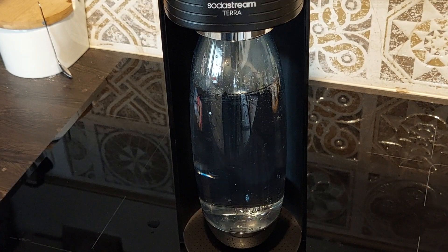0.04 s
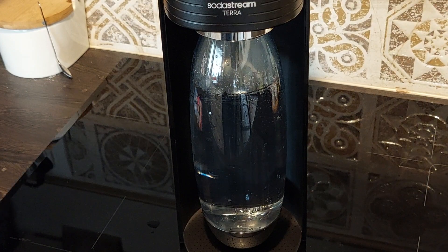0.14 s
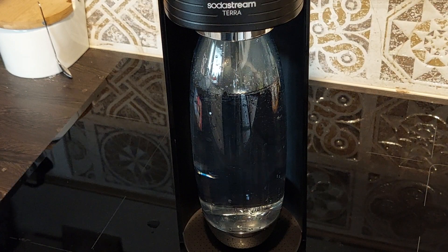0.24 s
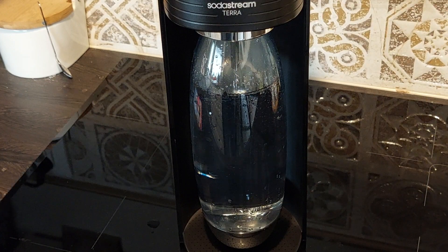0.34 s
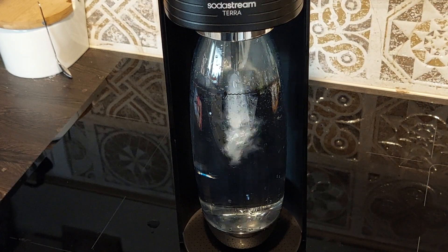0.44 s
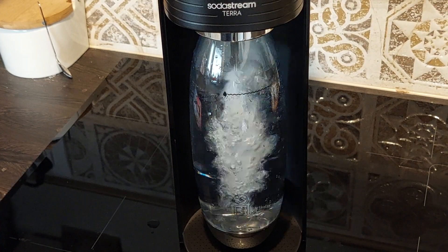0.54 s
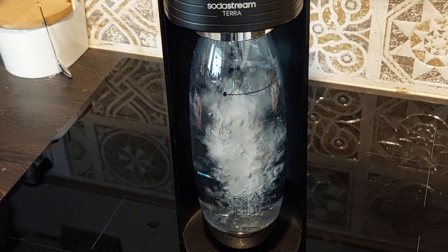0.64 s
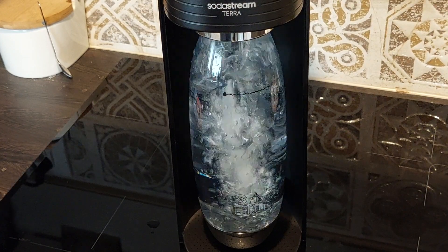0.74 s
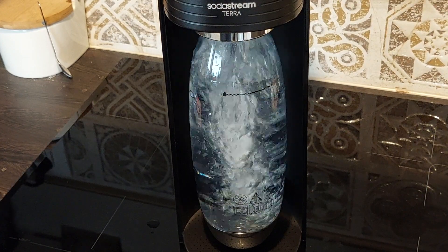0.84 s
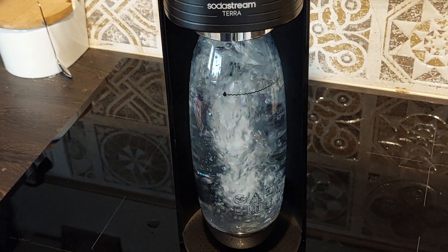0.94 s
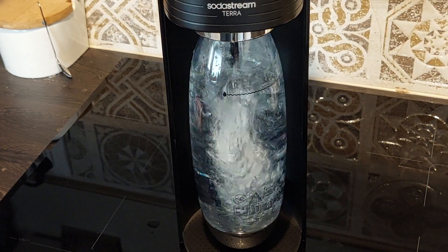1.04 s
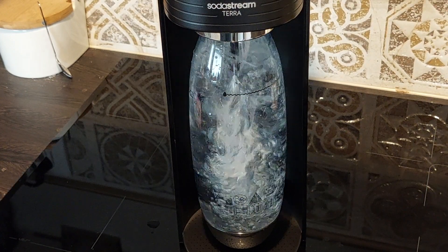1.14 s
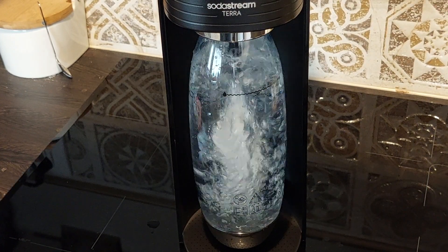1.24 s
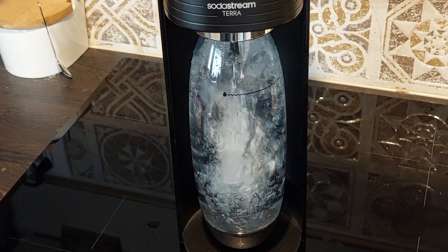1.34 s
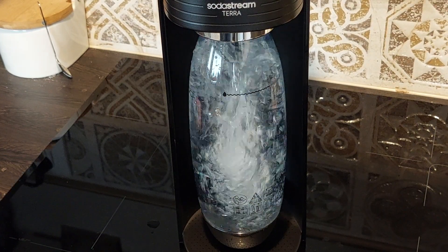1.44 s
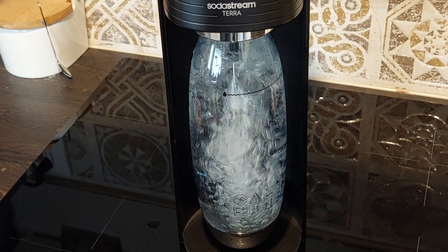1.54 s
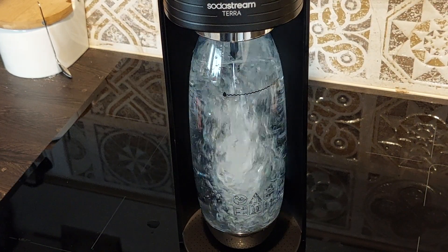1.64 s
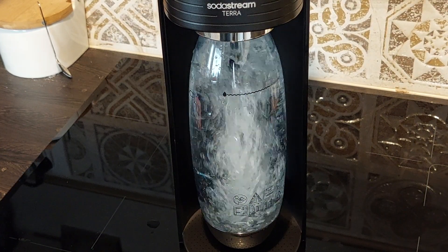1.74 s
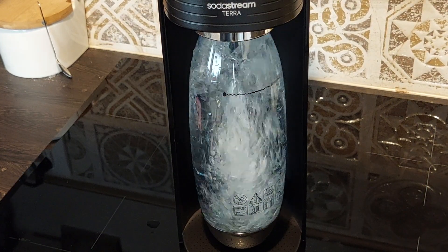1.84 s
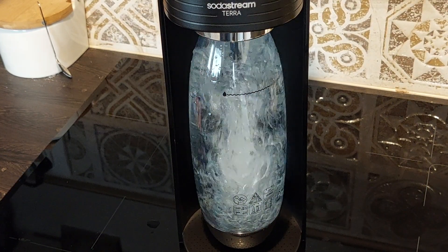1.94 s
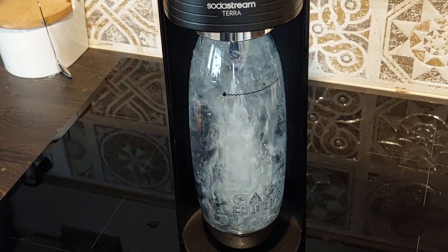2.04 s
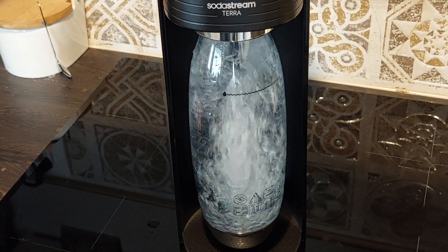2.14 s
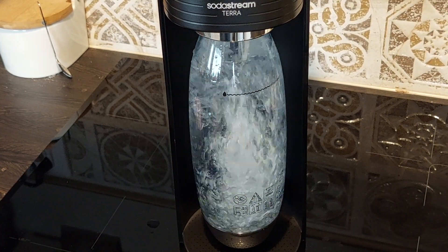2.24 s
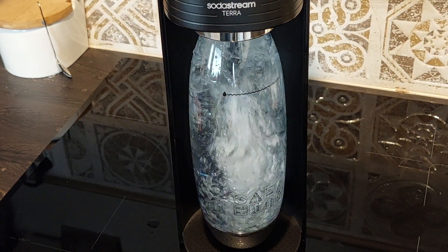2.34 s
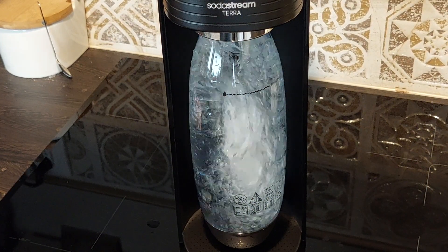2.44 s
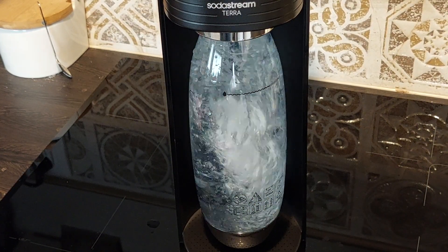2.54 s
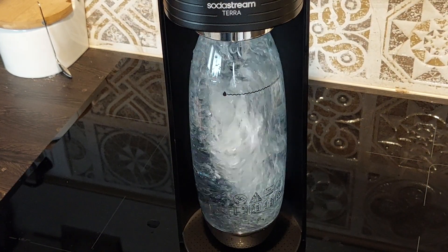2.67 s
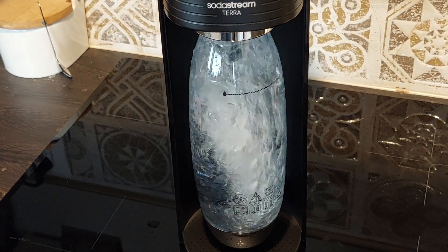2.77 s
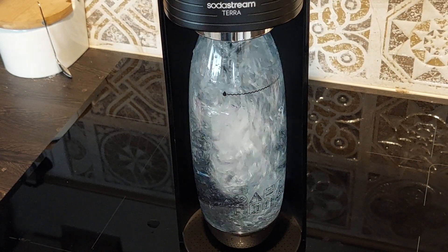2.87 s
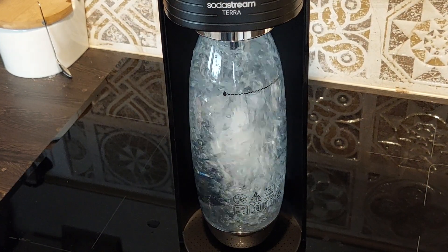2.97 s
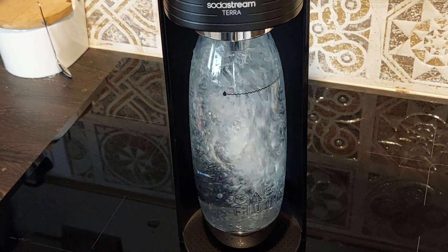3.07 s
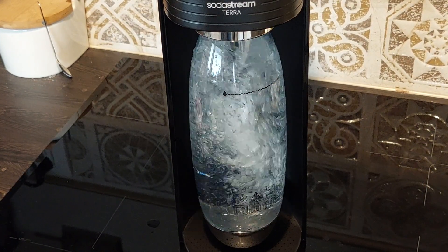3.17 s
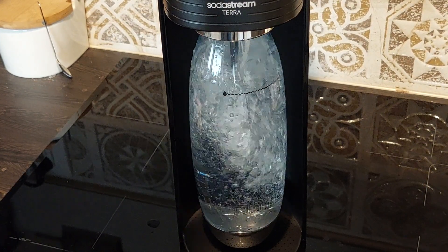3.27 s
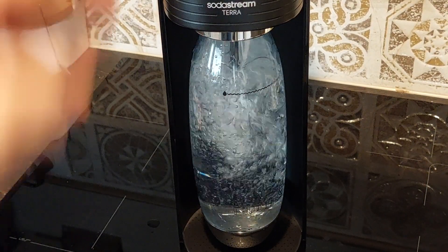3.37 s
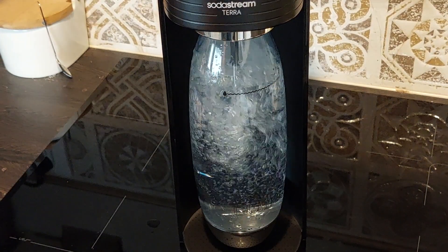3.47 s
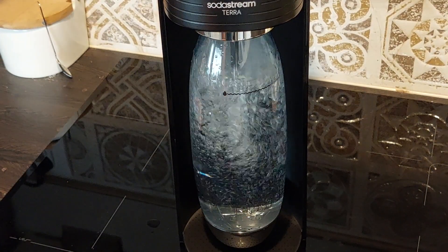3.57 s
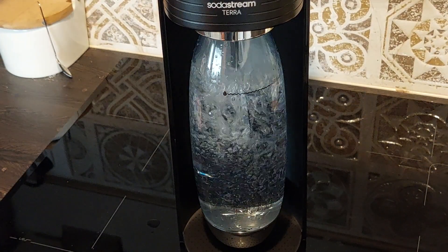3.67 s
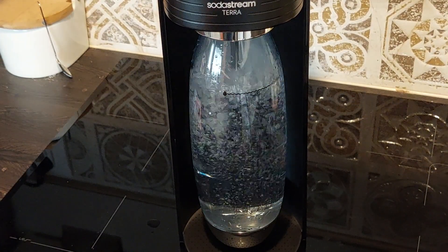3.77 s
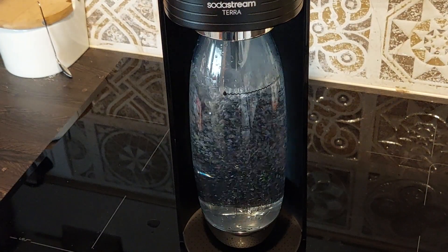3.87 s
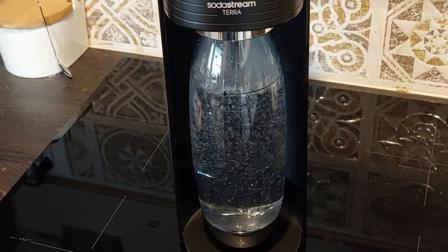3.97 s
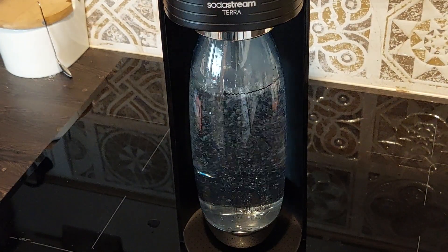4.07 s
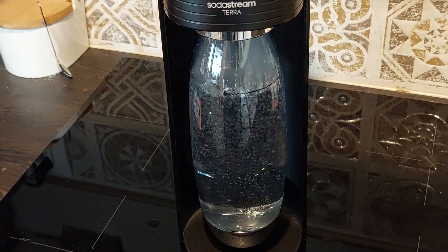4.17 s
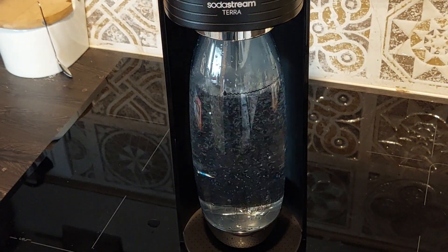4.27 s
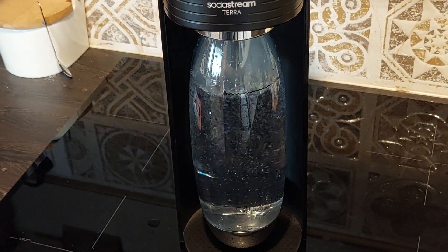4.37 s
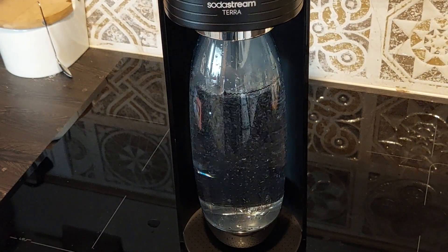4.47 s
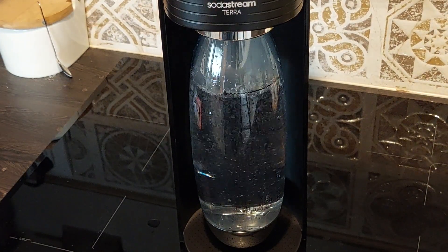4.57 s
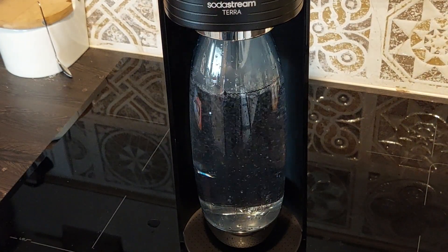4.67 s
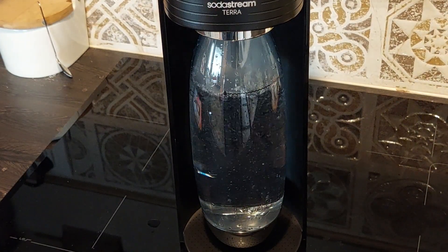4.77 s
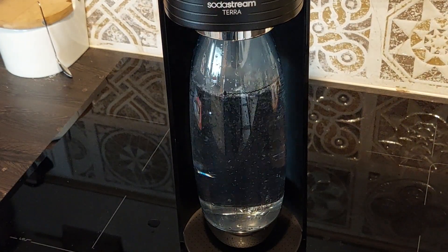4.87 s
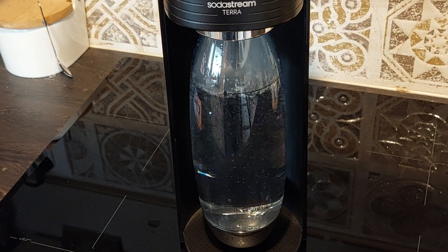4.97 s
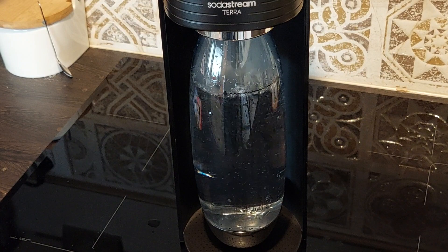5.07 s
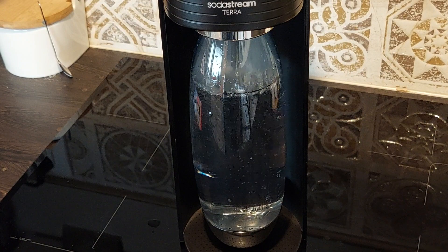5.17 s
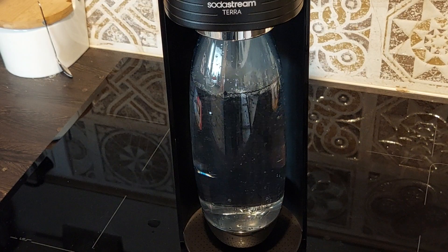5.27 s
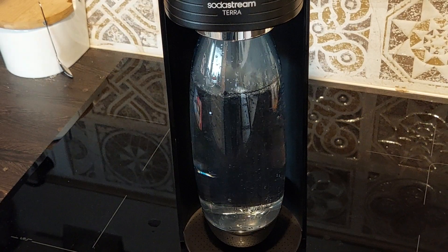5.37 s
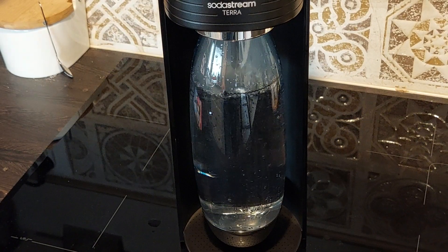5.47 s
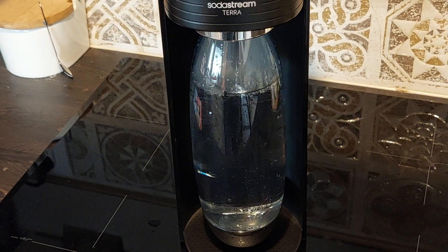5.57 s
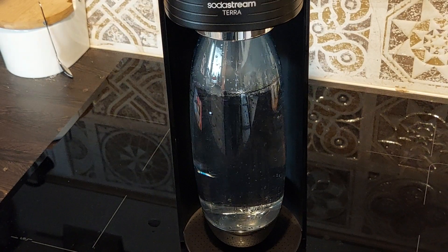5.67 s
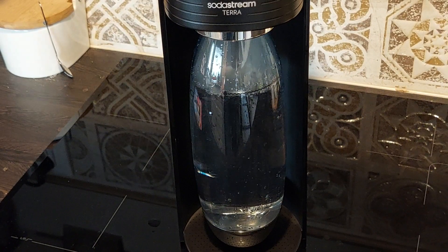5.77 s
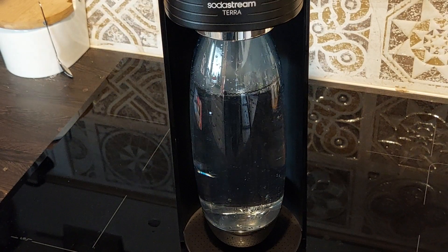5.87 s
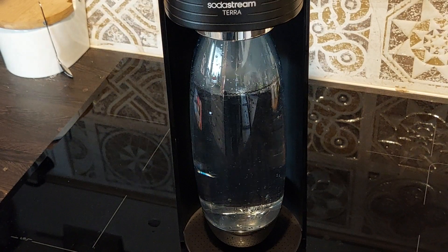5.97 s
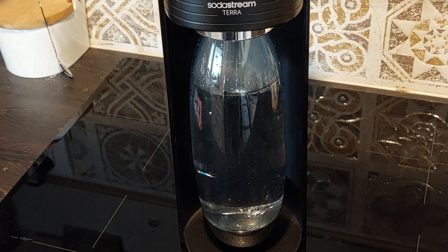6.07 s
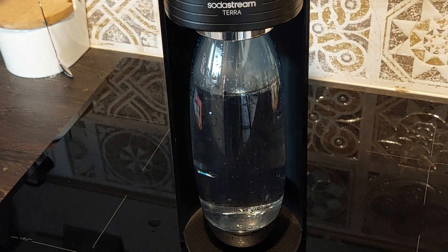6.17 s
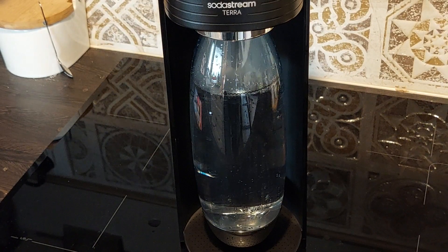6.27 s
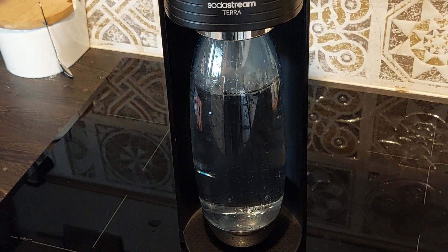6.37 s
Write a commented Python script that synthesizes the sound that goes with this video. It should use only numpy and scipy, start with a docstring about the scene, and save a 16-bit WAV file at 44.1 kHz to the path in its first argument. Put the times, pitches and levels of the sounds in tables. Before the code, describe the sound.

A carbonation machine is heard close up in a kitchen with a very faint hum. After a few barely audible high squeaks, gas jets into a bottle of water at about 0.3 seconds. The nozzle hisses thinly, the cap spits, and the water rumbles and froths in gulps, with single large bubbles standing out. At 1.5 seconds a relief valve opens suddenly with a loud, very bright hiss that holds over the churning. At about 3 seconds the jet eases off and the hiss drops in steps, again near 3.4 and 3.8 seconds. The bubbling fades with a few last spits and is gone by 4 seconds. Gas keeps seeping through the valve as a soft, high hiss with faint, fluttering hollow tones, which swell slightly from 5.3 seconds and carry on to the end at about 6.4 seconds.

```python
"""A kitchen, humming quietly, where a carbonator jets gas into a bottle of water. After a few faint
squeaks the nozzle hisses, the cap spits, and the water rumbles, froths and bubbles. When the pressure
is up, a relief valve opens with a bright hiss. The jet stops, the hiss drops in steps, and the gas goes
on seeping out through the valve, singing faintly in the hollows behind it."""
import sys
import numpy as np
from scipy import signal
from scipy.fft import rfft, irfft, next_fast_len
from scipy.io import wavfile
from scipy.ndimage import uniform_filter1d

SR = 44100
rng = np.random.default_rng(int(sys.argv[2]) if len(sys.argv) > 2 else 0)


def store_wav(level_fs):
    """Save 16-bit WAV to argv[1]."""
    pcm = np.round(np.clip(np.atleast_2d(level_fs), -1, 1) * 32767)
    wavfile.write(sys.argv[1], SR, pcm.T.astype(np.int16))


N = 283122


def gain_of(db):
    """Turns decibels into a number to multiply a sound by."""
    return 10 ** (np.asarray(db) / 20)


def evened(x):
    """Scales a sound to an average power of 1."""
    return x / np.sqrt(np.mean(x ** 2) + 1e-20)


def add(mix, start_s, sound):
    """Mixes a sound in at a given time."""
    mix[round(start_s * SR):][:len(sound)] += sound


def at_pitch(table, hz):
    """Looks up a table's value at the pitches hz, sliding between its rows."""
    pitches, values = np.transpose(table)
    return np.interp(np.log(hz + 1), np.log(pitches + 1), values)


def level_curve(table, column):
    """Turns a column of levels into a gain over time, fading out within 30 ms beyond each end."""
    table = np.asarray(table)
    times = np.r_[table[0, 0] - .03, table[:, 0], table[-1, 0] + .03]
    return gain_of(np.interp(np.arange(N) / SR, times, np.r_[-100, table[:, column], -100]))


def swells(table, column, rise_s, squareness=1.53):
    """Gain of brief swells or dips: each starts fast and ends more sharply the higher the squareness."""
    t, db = np.arange(N) / SR, np.zeros(N)
    for row in table:
        age = np.maximum(t - row[0], 0)
        ending = np.exp(-(age / (row[1] + rise_s)) ** squareness)
        db += row[column] * (1 - np.exp(-age / rise_s)) * ending
    return gain_of(db)


def colour(table, rings=()):
    """A sound's colour (how strong each pitch is), with a hump wherever something rings."""
    return lambda hz, s: at_pitch(table, hz) + sum(
        db / (1 + (2 * (hz - centre) / width) ** 2) for centre, width, db in rings)


def peaks_db(rings, hz):
    """A colour made only of steep peaks, one for each ringing pitch."""
    power = sum(gain_of(2 * db) / (1 + (2 * (hz - centre) / width) ** 2) ** 1.54
                for centre, width, db in rings)
    return 10 * np.log10(power + 1e-12)


def noise(shape, size, patchy_db, patch_hz, patch_s, flicker_db):
    """Noise with the colour shape(hz, s), drifting loud and soft patches, and an overall flicker."""
    hop, hz = size // 4, np.fft.rfftfreq(size, 1 / SR)[:, None]
    frames = N // hop + 5
    real, imag, patches = rng.standard_normal((frames, len(hz), 3)).T
    tall, long = max(round(patch_hz * size / SR), 1), max(round(patch_s * SR / hop), 1)
    for _ in range(2):
        patches = uniform_filter1d(uniform_filter1d(patches, tall, 0), long, 1)
    flicker = uniform_filter1d(rng.standard_normal(frames), long)
    db = shape(hz, np.arange(frames) * hop / SR)
    db = db + patchy_db * patches / patches.std() + flicker_db * flicker / flicker.std()
    spectrum = (real + 1j * imag) * gain_of(db)
    return evened(signal.istft(spectrum, nperseg=size, noverlap=size - hop)[1][:N])


# How much of a sound is echo when wet is 1: (pitch [Hz], share of power [0-1])
ECHO_SHARE = [(100, 0.18), (600, 0.37), (3000, 0.65), (12000, 0.86)]


def in_kitchen(x, likeness, lean, wet=1):
    """Carries a sound to the left and right, both directly and as echoes off tiles and counter."""
    size = next_fast_len(N + SR // 2)
    hz, t = np.fft.rfftfreq(size, 1 / SR), np.arange(SR // 2) / SR
    fade_s = np.array([[0.15]] * 3 + [[.012]] * 2)  # three room echoes, two from close surfaces
    tails = rng.standard_normal((5, len(t))) * gain_of(-60 * t / fade_s)
    tails = rfft(tails / np.linalg.norm(tails, axis=1, keepdims=True), size)
    near = tails[3:] / np.abs(tails[3:])  # close surfaces scramble the wave's timing on each side
    echo, same = np.clip(wet * at_pitch(ECHO_SHARE, hz), 0, 1), np.clip(at_pitch(likeness, hz), 0, 1)
    shared = np.sqrt(1 - echo) + np.sqrt(echo) * tails[0]
    own = np.sqrt(1 - echo) * near + np.sqrt(echo) * tails[1:3]
    balance = gain_of(np.outer([.5, -.5], at_pitch(lean, hz)))
    paths = (np.sqrt(same) * shared + np.sqrt(1 - same) * own) * balance
    power = np.abs(paths.mean(0)) ** 2 + 0.14 * (np.abs(paths) ** 2).mean(0)
    paths = paths / np.sqrt(uniform_filter1d(power, round(90 * size / SR)))  # keeps only fine ripples
    return irfft(rfft(x, size) * paths, size)[:, :N]


# The tones of a motor's hum: (multiple of its turning rate, relative level [dB])
MOTOR_TONES = [(8, -9), (9, -10), (10, -10), (11, -9), (14, -21), (15, -17.5), (16, -18), (25, -29)]


def motor(turns_per_s=27.01, whine_hz=652, whine_db=-24):
    """A distant appliance hums and whines; each tone wavers slowly in loudness."""
    t, waver_times = np.arange(N) / SR, np.arange(0, N / SR + .2, .2)
    tones = [(multiple * turns_per_s, db) for multiple, db in MOTOR_TONES] + [(whine_hz, whine_db)]
    out = np.zeros(N)
    for hz, db in tones:
        waver_db = 2.1 * np.interp(t, waver_times, rng.standard_normal(len(waver_times)))
        out += gain_of(db + waver_db) * np.sqrt(2) * np.sin(2 * np.pi * (hz * t + rng.random()))
    return out


# The colour of the quiet kitchen: (pitch [Hz], relative level [dB])
ROOM_COLOUR = [(15, -71), (25, -30), (59, -13.5), (166, -13), (200, -12), (263, -7), (659, -27), (714, -34),
               (2000, -32), (2990, -54), (3720, -32), (5140, -47), (6380, -30), (6920, -41), (16000, -47)]
# How its hum swells and fades: (time [s], relative level [dB])
ROOM_LEVEL = [(0.0, -60.5), (0.14, -56.5), (4.0, -63), (4.54, -60), (4.73, -53), (4.98, -56.5),
              (6.42, -57.5)]


def room(likeness=0.14, lean_db=4.8):
    """The kitchen's air and the motor make a low hum, a little louder on the left."""
    grain = dict(size=4096, patchy_db=2.0, patch_hz=80, patch_s=.06, flicker_db=0.5)
    left, other = noise(colour(ROOM_COLOUR), **grain), noise(colour(ROOM_COLOUR), **grain)
    right = likeness * left + np.sqrt(1 - likeness ** 2) * other
    hum = gain_of(-2.5) * np.array([left, right]) + motor()
    return level_curve(ROOM_LEVEL, 1) * hum * gain_of([[lean_db / 2], [-lean_db / 2]])


# Thin squeaks: (time [s], length [s], first pitch [Hz], last pitch [Hz], level [dB])
SQUEAKS = [(0, .02, 5950, 5950, -76), (0.112, 0.056, 6300, 6460, -75), (.02, .03, 14100, 14400, -82),
           (.11, .06, 13500, 13300, -78), (0.196, 0.07, 13200, 14100, -73), (.29, 0.046, 13200, 14600, -75)]


def squeaks():
    """Faint, short tones, most of them gliding, come just before the gas flows."""
    out = np.zeros(N)
    for start_s, length, from_hz, to_hz, db in SQUEAKS:
        hz = np.linspace(from_hz, to_hz, round(length * SR))
        tone = np.sin(2 * np.pi * np.cumsum(hz) / SR) * np.hanning(len(hz))
        add(out, start_s, gain_of(db) * tone)
    return out


def bubble(hz, length):
    """One bubble rings and dies away, its pitch rising as it nears the surface."""
    t = np.arange(round(3 * length * SR)) / SR
    turns = hz * (t + 0.028 * t ** 2 / length)
    return (1 - np.exp(-t / (0.09 * length))) * np.exp(-2 * t / length) * np.sin(2 * np.pi * turns)


def swarm(low_hz, high_hz, cycles, per_s, spread_db, pitches):
    """Many small bubbles ring at random times, some louder than others."""
    out = np.zeros(N)
    for hz in np.geomspace(low_hz, high_hz, pitches):
        strength = gain_of(spread_db * np.minimum(rng.exponential(1, N), 4))
        starts = rng.random(N) < per_s / pitches / SR
        out += signal.oaconvolve(strength * starts, bubble(hz, cycles / hz))[:N]
    return evened(out)


# Where the bottle's wall and water ring: (pitch [Hz], width [Hz], boost [dB])
BOTTLE_RINGS = [(228, 13, 3.5), (743, 37, 1), (1022, 32, -6), (1458, 37, 5)]


def clouding(clear, white, from_s=0.5, to_s=1.52):
    """The sound's colour slides as gas turns clear water white: smaller bubbles ring higher."""
    def shape(hz, s):
        share = np.interp(s, [from_s, to_s], [0, 1])
        return (1 - share) * colour(clear, BOTTLE_RINGS)(hz, s) + share * colour(white, BOTTLE_RINGS)(hz, s)
    return shape


# Two colours each, for clear water and then white water: (pitch [Hz], relative level [dB])
RUMBLE_COLOURS = [(18, -60), (30, -50), (62, -37), (98, 5), (115, 0), (150, -2), (182, -35), (217, 3.5),
                  (268, -15), (351, -0.5), (500, -19), (650, -26), (1100, -120)], [(18, -55), (30, -60),
                  (65, -35), (98, 5.5), (112, -10), (128, 0.5), (177, -21), (214, 0), (250, -7), (301, 3),
                  (331, -3.5), (500, -13.5), (650, -49), (1100, -120)]  # the whole bottle shaking
FROTH_COLOURS = [(260, -43), (450, -7.5), (680, -8), (755, -2), (938, -7.5), (1080, 3.5), (1210, -6),
                 (1450, -4.5), (2700, -22.5), (3510, -54), (5940, -120)], [(260, -24), (450, -5), (527, -6),
                 (904, -5), (967, -34), (1040, 2.5), (1230, -5.5), (1590, 1), (2700, -8), (3510, -45),
                 (5940, -120)]  # clouds of bubbles
SPRAY_COLOURS = [(1410, -1), (2400, 1.5), (3030, -4), (4160, -7.5), (5420, -3.5), (5900, -40), (7290, -3),
                 (8500, -40), (11000, -53), (18700, -120)], [(1410, -14.5), (2400, 3), (3910, 2), (4600, 1),
                 (5870, -5), (6350, -3), (7890, -18), (8500, -14), (11000, -8), (18700, -120)]  # the finest bubbles and droplets
# The jet's relative strength between surges: (time [s], rumble [dB], froth [dB], spray [dB])
JET_LEVELS = [(0.26, -86, -75, -84), (0.33, -63, -61.5, -78), (0.425, -56.5, -66, -78),
              (0.432, -78, -49, -48), (0.455, -52.5, -44, -33.5), (0.55, -41, -41, -42.5),
              (0.8, -34.5, -31.5, -37), (1.07, -38, -33.5, -33), (1.46, -42, -35.5, -33.5),
              (2.1, -45, -36, -39), (3.0, -43, -36, -38.5), (3.06, -47.5, -39.5, -44),
              (3.12, -51.5, -44, -45), (3.22, -51, -47.5, -43.5), (3.5, -56, -53, -49.5),
              (3.63, -58.5, -51.5, -52.5), (3.8, -56.5, -59, -65), (3.88, -72, -70, -59),
              (4.0, -76, -74, -85)]
# Gulps of gas: (time [s], length [s], rumble boost [dB], froth boost [dB], spray boost [dB])
SURGES = [(0.33, 0.062, 13, 8.5, 4), (0.49, 0.041, 14, 6, -6), (0.567, 0.087, 4.5, 7, 1),
          (0.69, 0.046, 3, 9, -5), (0.845, 0.022, 7, 4.5, -0.5), (0.99, 0.024, -4, 3.5, -2),
          (1.22, 0.028, 5, 3.5, -4), (1.39, 0.026, 12, 6, -3), (1.495, 0.022, 9, 9.5, -7),
          (1.555, 0.047, 0, 4, 1.5), (1.615, 0.02, 6, 6.5, -3), (1.73, 0.065, 3.5, 5, 0.5),
          (1.815, 0.047, 13, 2, 2), (2.0, 0.023, -11, 2, 2), (2.22, 0.12, 0, 2.5, 3),
          (2.54, 0.015, 8, 4, 1), (2.65, 0.04, -6, 0, -5), (2.86, 0.019, 6, 6, 3), (2.995, 0.055, 2, 4, -4),
          (3.12, 0.017, 6, 9, 9), (3.26, 0.023, 3, -1, 7), (3.345, 0.059, 4.5, -1, 2.5),
          (3.4, 0.03, 6, -3, -1), (3.53, 0.036, 6, 1, -4), (3.652, 0.032, 5, 13.5, 8),
          (3.72, 0.018, 2, 0, -5), (3.775, .04, 0, 13, 1), (3.83, .02, 1, 5, 6)]


def water():
    """The jet shakes the bottle, fills it with ringing clouds of bubbles and throws spray."""
    rumble = noise(clouding(*RUMBLE_COLOURS), size=2048,
                   patchy_db=1.5, patch_hz=60, patch_s=0.036, flicker_db=1.5)
    froth = noise(clouding(*FROTH_COLOURS), size=1024,
                  patchy_db=4.0, patch_hz=200, patch_s=0.023, flicker_db=1.0)
    froth += gain_of(-9.0) * swarm(881.6, 2534, cycles=21, per_s=700, spread_db=4.5, pitches=16)
    spray = noise(clouding(*SPRAY_COLOURS), size=256,
                  patchy_db=4.0, patch_hz=500, patch_s=0.015, flicker_db=4.0)
    spray += gain_of(-7.5) * swarm(2595, 5310, cycles=14.4, per_s=400, spread_db=3.0, pitches=12)
    spray += gain_of(-22) * swarm(5500, 8000, cycles=6, per_s=1200, spread_db=3.5, pitches=8)
    layers = [rumble, evened(froth), evened(spray)]
    return sum(level_curve(JET_LEVELS, column) * swells(SURGES, column + 1, rise_s=0.004) * layer
               for column, layer in enumerate(layers, start=1))


# The colour of the nozzle's hiss: (pitch [Hz], relative level [dB])
NOZZLE_COLOUR = [(3240, -20), (5500, -20), (7130, -29), (8840, -9.5), (10800, -9), (11600, -1),
                 (12500, 1.5), (13500, -3.5), (15700, -8)]
# Its loudness between spurts: (time [s], level [dB])
NOZZLE_LEVEL = [(0.3, -80), (0.324, -71), (0.424, -78), (0.43, -53), (0.452, -44), (0.478, -48),
                (0.542, -55), (0.846, -46.5), (1.5, -39.5), (3.0, -55)]
# Spurts of gas in the nozzle: (time [s], length [s], boost [dB])
SPURTS = [(1.095, .02, -1), (1.2, 0.043, 3.5), (1.37, 0.023, 6)]
# How alike left and right are, for nozzle and valve: (pitch [Hz], likeness [0-1])
HISS_LIKENESS = [(60, 0.14), (130, 0.72), (290, 0.83), (640, 0.46), (1410, 0.38), (3100, 0.49),
                 (6820, 0.19), (15000, 0.0091)]
# Which side is louder, for nozzle and seeping valve: (pitch [Hz], left minus right [dB])
HISS_LEAN = [(60, 15), (130, 16), (290, 11), (640, 7), (1410, 1), (3100, -0.5), (6820, 0), (9500, 1.5),
             (12500, -7), (15000, -4)]


def nozzle():
    """Gas rushes down the inlet nozzle with a thin hiss, until the valve drowns it out."""
    hiss = noise(colour(NOZZLE_COLOUR), size=512, patchy_db=0, patch_hz=400, patch_s=0.026, flicker_db=0.6)
    level = level_curve(NOZZLE_LEVEL, 1) * swells(SPURTS, 2, rise_s=0.0032)
    return in_kitchen(level * hiss, HISS_LIKENESS, HISS_LEAN)


# Spits at the cap: (time [s], length [s], pitch [Hz], width [Hz], level [dB])
SPITS = [(0.333, .06, 1300, 1800, -61), (0.427, 0.09, 7000, 972, -43), (0.433, .06, 8900, 700, -52),
         (0.446, 0.067, 2200, 1200, -47), (0.448, 0.054, 12000, 1200, -54), (0.45, .06, 14600, 1500, -50),
         (0.65, 0.035, 6944, 3980, -46.5), (0.798, 0.027, 6019, 3000, -42.5), (0.96, .012, 6800, 2500, -43),
         (1.09, .015, 13000, 6000, -40), (1.103, 0.018, 6200, 2500, -37), (1.213, 0.0067, 5800, 3000, -36),
         (1.36, 0.022, 7020, 2500, -46), (1.382, 0.015, 12000, 8000, -40), (2.904, 0.015, 6588, 2310, -42),
         (2.5, 0.013, 7500, 2500, -45), (3.69, 0.02, 5900, 3000, -38), (3.72, 0.013, 6000, 3500, -40),
         (3.805, 0.042, 4400, 1500, -49.5)]


def spits():
    """Gas and droplets spit at the cap in short, sudden bursts of noise."""
    out, t = np.zeros(N), np.arange(8192) / SR
    for start_s, length, hz, width, db in SPITS:
        band = gain_of(peaks_db([(hz, width, 0)], np.fft.rfftfreq(len(t), 1 / SR)))
        burst = evened(irfft(rfft(rng.standard_normal(len(t))) * band))
        rise_and_fall = (1 - np.exp(-t / 0.0019)) * np.exp(-(t / length) ** 2)
        add(out, start_s, gain_of(db) * burst * rise_and_fall)
    return out


# Single large bubbles: (time [s], level [dB], pitch [Hz], length [s])
LARGE_BUBBLES = [(0.482, -31.5, 1164, 0.035), (0.501, -28, 150, 0.023), (0.52, -27, 122, 0.02),
                 (0.57, -27, 647, 0.016), (0.575, -23.5, 982, 0.026), (0.61, -24, 1462, .015),
                 (0.682, -23.5, 1082, 0.02), (0.695, -25, 780, .01), (0.717, -21, 1066, 0.025),
                 (0.726, -25, 125, 0.033), (0.829, -23.5, 1110, 0.018), (0.832, -23, 340, 0.013),
                 (0.856, -18, 218, 0.026), (0.86, -24, 1500, 0.022), (0.928, -21, 2070, 0.015),
                 (0.972, -25, 1053, 0.032), (0.989, -19, 1500, 0.02), (0.998, -22, 1056, 0.023),
                 (1.047, -23, 1486, 0.014), (1.051, -21, 2380, 0.01), (1.099, -24.5, 1104, 0.017),
                 (1.153, -37, 4800, .008), (1.159, -23, 1930, 0.016), (1.179, -23, 2200, 0.015),
                 (1.222, -25, 228, 0.019), (1.227, -27, 1590, 0.037), (1.261, -26, 1370, 0.014),
                 (1.315, -22, 2270, 0.017), (1.375, -21, 1544, 0.012), (1.38, -24, 2010, .012),
                 (1.255, -28, 3720, .025), (1.396, -29, 3630, 0.032), (1.45, -28, 5570, 0.011),
                 (1.496, -18.5, 1640, 0.029), (1.519, -24, 1720, 0.018), (1.557, -29, 1150, 0.012),
                 (1.617, -21, 1060, 0.014), (1.727, -21.5, 1550, 0.01), (1.747, -29, 2080, 0.014),
                 (2.012, -29, 880, 0.018), (2.14, -26, 1794, 0.019), (2.742, -24, 1950, 0.015),
                 (2.999, -31, 2060, 0.017), (3.015, -24.5, 1027, 0.017), (3.023, -30, 640, .012),
                 (3.063, -33, 1470, 0.012), (3.234, -28.5, 1460, 0.018), (3.351, -27, 1580, 0.0096),
                 (3.457, -30, 4500, 0.012), (3.489, -27, 2276, 0.011), (3.655, -28, 1440, 0.011)]


def large_bubbles(small_count=4, small_db=-8.5, spread_octaves=0.275, spread_s=0.015):
    """Large bubbles stand out from the froth, each shedding a few smaller ones."""
    out = np.zeros(N)
    for start_s, db, hz, length in LARGE_BUBBLES:
        add(out, start_s, gain_of(db) * bubble(hz, length))
        for late, pitch in rng.random((small_count, 2)):
            small = bubble(hz * 2 ** (spread_octaves * (2 * pitch - 1)), .5 * length)
            add(out, start_s + spread_s * late ** 2, gain_of(db + small_db) * small)
    return out


# The valve's hiss, which starts at once and drops in steps: (time [s], level [dB])
VALVE_LEVEL = [(1.494, -57), (1.499, -20.5), (1.53, -25.5), (1.567, -24), (1.63, -25), (3.012, -25),
               (3.058, -31.5), (3.33, -32.5), (3.385, -39.5), (3.8, -40), (3.84, -43.5), (5.51, -42),
               (6.0, -44.5), (6.42, -48.5)]
# Its colour when wide open (gush) and nearly shut (seep): (pitch [Hz], relative level [dB])
GUSH_COLOUR = [(4120, -20), (7000, -13), (7910, -14.5), (9490, -5.5), (10600, -4), (11000, -1), (11500, 5),
               (11900, 2), (12500, 2.5), (13300, 2), (13800, -2), (14800, -3.5), (15700, -4)]
SEEP_COLOUR = [(1410, -41), (2400, -48), (2580, -21), (3110, -15.5), (3730, -21), (4350, -10.5), (4870, -6),
               (5300, -7.5), (5790, -16.5), (6100, -12.5), (7990, -18), (8510, -17), (8990, -8.5),
               (10800, -11), (11600, -8.5), (12600, 1), (13150, -3), (13600, -16), (15700, -8)]
# Where the valve rings in each case: (pitch [Hz], width [Hz], boost [dB])
GUSH_RINGS = [(9180, 150, 5.5), (9700, 100, 6), (11460, 62, 11), (11540, 160, -13), (11900, 99, 0.5),
              (12620, 100, 6.5), (14100, 54, -1)]
SEEP_RINGS = [(9200, 140, 8), (9980, 90, 7), (11140, 80, 11), (12150, 90, 5), (12540, 70, 6),
              (12740, 90, 7), (14000, 200, 6)]
# Which side the gush is louder on: (pitch [Hz], left minus right [dB])
GUSH_LEAN = [(60, 0.0), (130, 4), (290, 8), (640, -1), (1410, 6), (3100, -21), (6820, 3.5), (15000, -10)]


def valve(seep_db=-47.5, gush_db=-21.5):
    """Swirling gas hisses out of the relief valve, sliding from a gush to a seep as the flow drops."""
    level = level_curve(VALVE_LEVEL, 1)
    opening = np.clip((20 * np.log10(level) - seep_db) / (gush_db - seep_db), 0, 1)
    grain = dict(size=1024, patchy_db=2.0, patch_hz=200, patch_s=.07, flicker_db=.5)
    gush = level * np.sqrt(opening) * noise(colour(GUSH_COLOUR, GUSH_RINGS), **grain)
    seep = level * np.sqrt(1 - opening) * noise(colour(SEEP_COLOUR, SEEP_RINGS), **grain)
    return in_kitchen(gush, HISS_LIKENESS, GUSH_LEAN) + in_kitchen(seep, HISS_LIKENESS, HISS_LEAN)


# Where the low and the high hollow ring: (pitch [Hz], width [Hz], relative level [dB])
LOW_RINGS = [(1165, 22, -22), (1415, 17, -9), (1450, 64, 2.5), (1537, 60, 5.5), (1619, 37, 0.5),
             (1867, 150, -6.5), (2014, 93, -9.5), (2253, 82, -10.5)]
HIGH_RINGS = [(4600, 420, -10.5), (4760, 220, -4), (4800, 120, -14), (5040, 92, -1.5), (5070, 84, -11),
              (5400, 50, -12)]
# Their loudness between puffs: (time [s], low level [dB], high level [dB])
HOLLOW_LEVELS = [(3.0, -52, -51), (3.2, -47.5, -50), (3.38, -49, -50), (3.45, -47, -53), (3.7, -49.5, -56),
                 (3.78, -54, -55), (3.88, -53, -62), (4.3, -53, -55), (4.93, -51, -50), (5.3, -53.5, -50.5),
                 (5.9, -56, -55), (6.42, -54.5, -52.5)]
# Puffs of gas through them: (time [s], length [s], low boost [dB], high boost [dB])
PUFFS = [(3.225, 0.077, 8.5, -3), (3.345, 0.013, 5, 0), (3.64, 0.026, 5, -4), (3.81, 0.031, 7, 6),
         (5.31, 0.023, 6.5, 2), (5.37, 0.56, 7.5, 2.5), (5.97, 0.19, 7, 5), (6.35, 0.014, 4.5, 0)]
# How alike left and right are: (pitch [Hz], likeness [0-1])
HOLLOW_LIKENESS = [(1100, 0.46), (1500, 0.3), (2300, 0.52), (5000, 0.28)]
# Which side is louder: (pitch [Hz], left minus right [dB])
HOLLOW_LEAN = [(1100, -2.5), (1500, -2), (2300, 3), (5000, -2.5)]


def hollows():
    """Seeping gas blows through two hollows behind the valve, and they sing with a slight flutter."""
    grain = dict(size=1024, patchy_db=1.0, patch_hz=90, patch_s=.03, flicker_db=0.5)
    puff = dict(rise_s=0.0054, squareness=11)
    low = noise(lambda hz, s: peaks_db(LOW_RINGS, hz), **grain) * swells(PUFFS, 2, **puff)
    high = noise(lambda hz, s: peaks_db(HIGH_RINGS, hz), **grain) * swells(PUFFS, 3, **puff)
    singing = level_curve(HOLLOW_LEVELS, 1) * low + level_curve(HOLLOW_LEVELS, 2) * high
    return in_kitchen(singing, HOLLOW_LIKENESS, HOLLOW_LEAN)


# How alike the water sounds on the left and right: (pitch [Hz], likeness [0-1])
WATER_LIKENESS = [(60, 0.67), (150, 0.98), (380, 0.73), (950, 0.63), (2380, 0.46), (5980, 0.26),
                  (15000, 0.27)]
# Which side it is louder on: (pitch [Hz], left minus right [dB])
WATER_LEAN = [(60, 1), (150, 2.5), (380, 0), (950, -2), (2380, 0), (5980, -1.5), (15000, 2)]


def scene():
    """All the sounds together; the churning water is two layers of the same sound, one quieter."""
    louder_churn = in_kitchen(gain_of(-1.5) * water(), WATER_LIKENESS, WATER_LEAN)
    near = in_kitchen(spits() + large_bubbles(), WATER_LIKENESS, WATER_LEAN, wet=0.88)
    quieter_churn = in_kitchen(gain_of(-6.0) * water(), WATER_LIKENESS, WATER_LEAN)
    return louder_churn + quieter_churn + near + nozzle() + valve() + hollows() + squeaks() + room()


def record(dry):
    """Cuts away the very highest treble, above 15740 Hz."""
    treble_cut = signal.firwin(2047, 15740, window=("kaiser", 10), fs=SR)
    return signal.oaconvolve(dry, treble_cut[None], "same")


dry = scene()
out = record(dry)
store_wav(out)
```